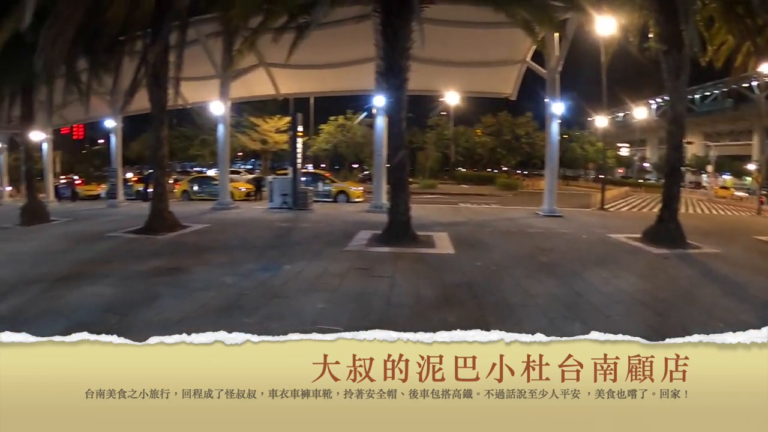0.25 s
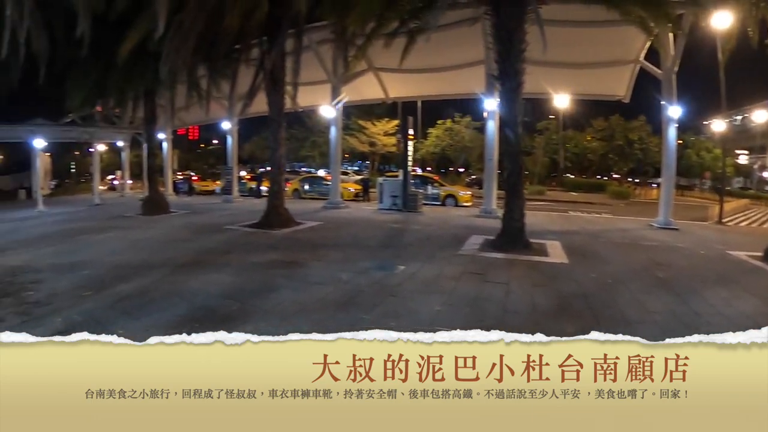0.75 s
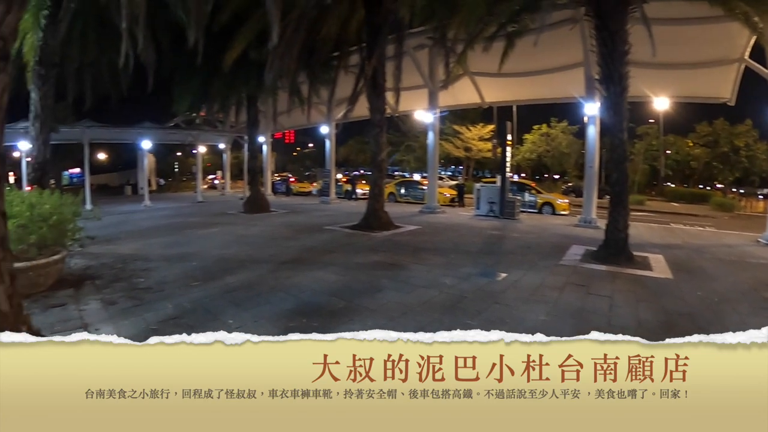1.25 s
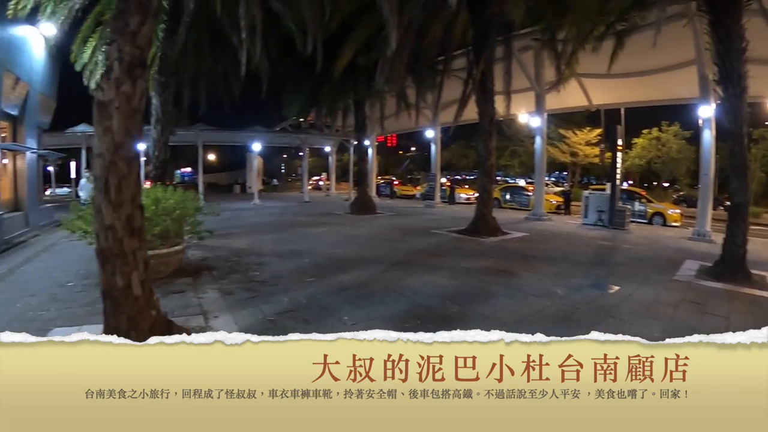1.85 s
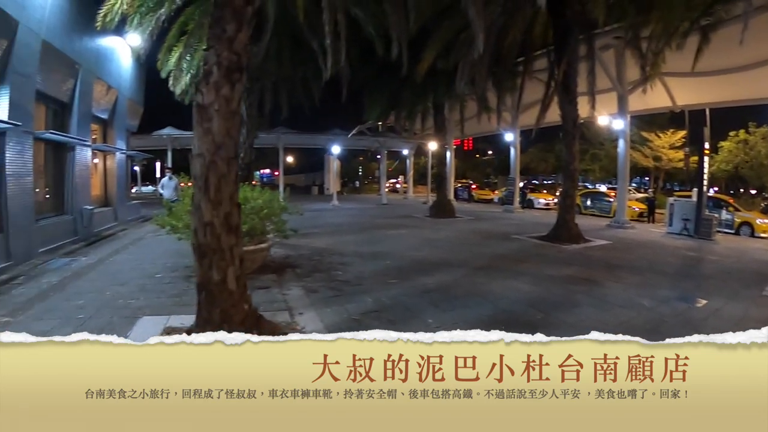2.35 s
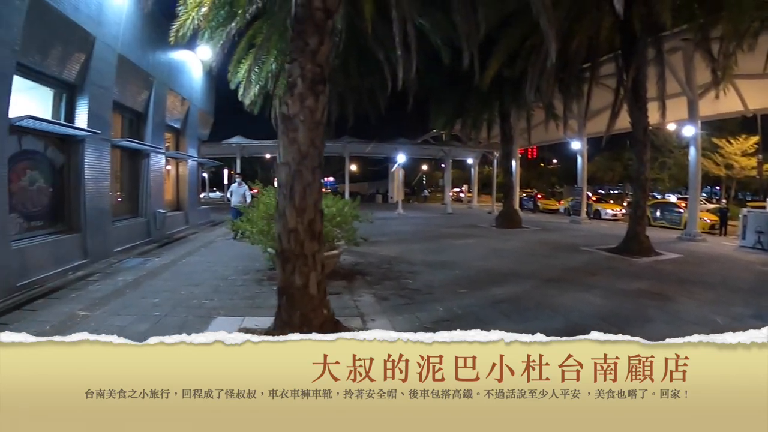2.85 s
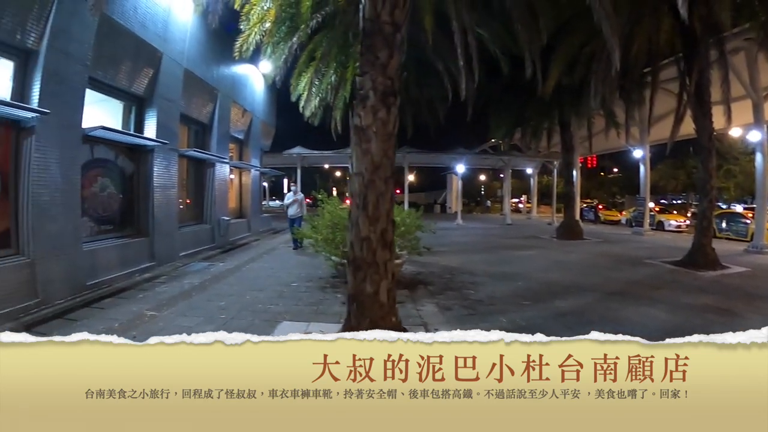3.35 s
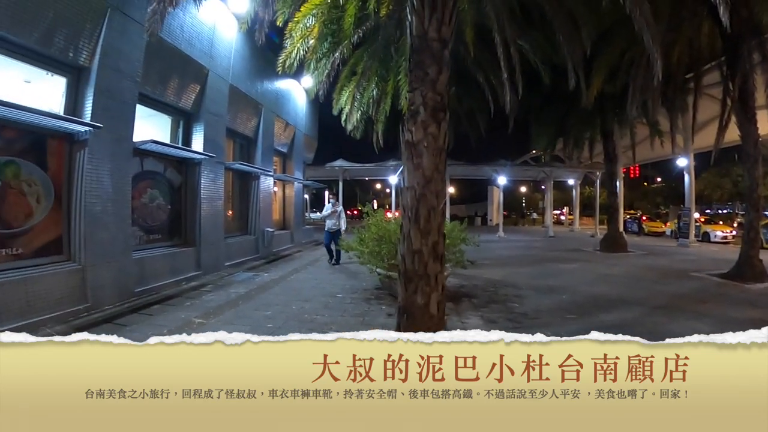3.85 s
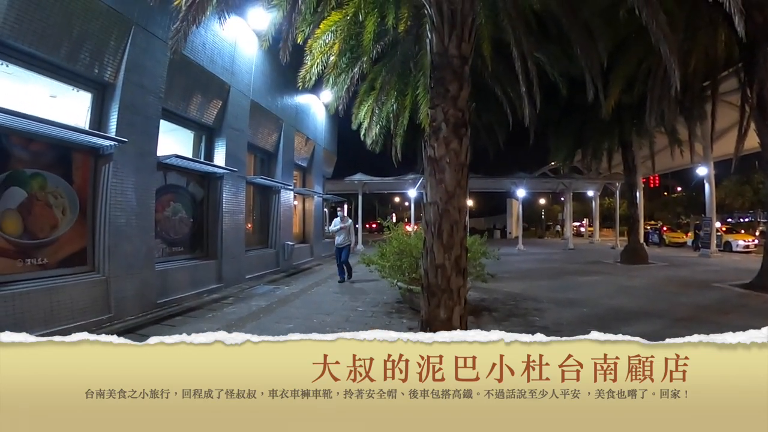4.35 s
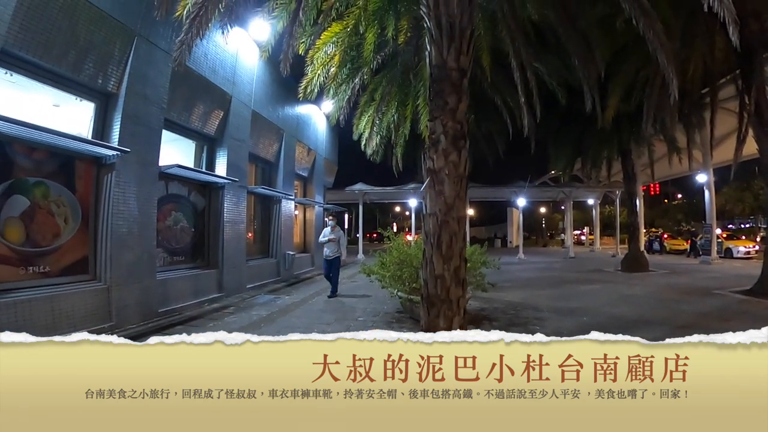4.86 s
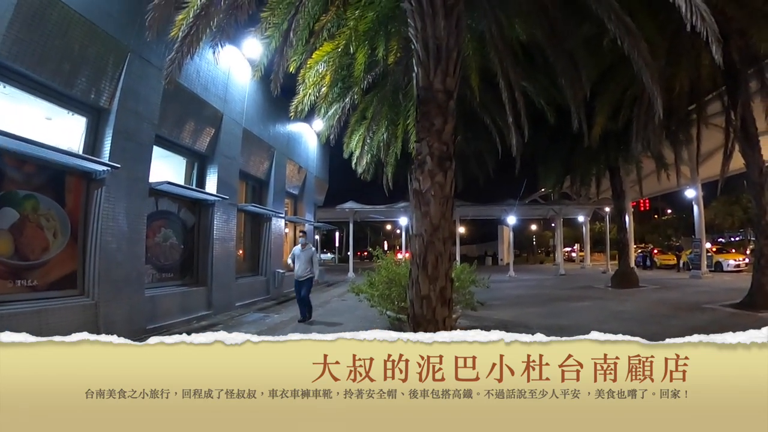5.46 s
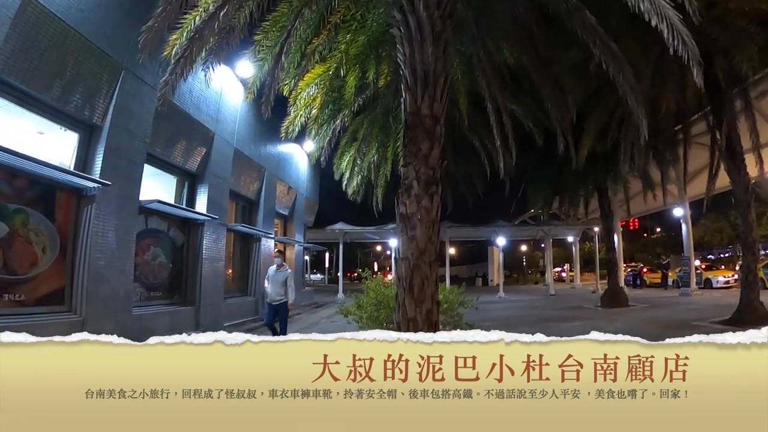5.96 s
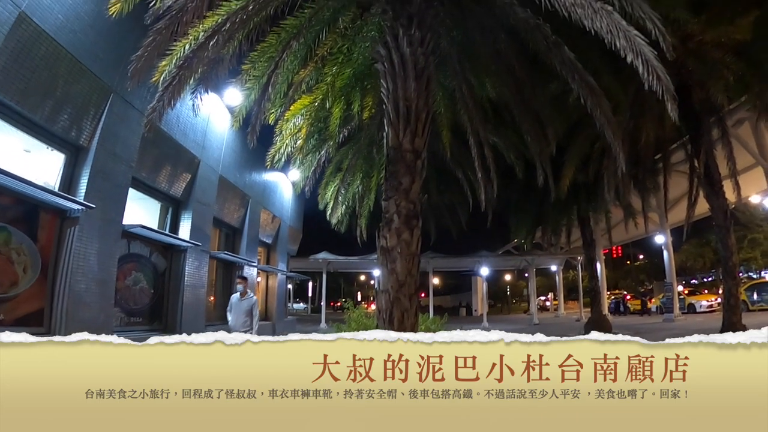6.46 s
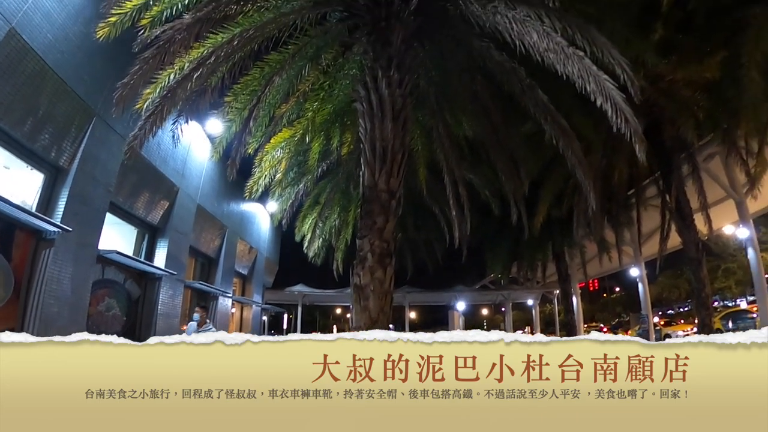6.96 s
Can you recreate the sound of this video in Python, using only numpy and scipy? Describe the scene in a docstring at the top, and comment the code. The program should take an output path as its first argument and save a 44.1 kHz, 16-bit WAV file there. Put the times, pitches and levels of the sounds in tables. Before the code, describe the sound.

A wide pavement beside a street at night, heard in stereo from about 13 metres. A dark, low rumble of distant engines runs throughout. From the start scooters approach faintly on the right, their exhaust drone and tyre rush growing; soft low air puffs bump the microphone at about 1.6 and 1.9 seconds. Around 2 to 2.5 the sound opens and brightens, with a wavering thin gear whine near 2.5 kHz and fine hiss. Two scooters and a third close behind sweep right to left around 3.5 to 3.7, all tones sliding down, the whine throbbing rapidly. An exhaust booms near 4.3, then a corner muffles them at about 4.6, leaving light echoes. A car's tyre roar and uneven low hum swell at 5.4 and ease. Air puffs come at 6.2 and 6.4, faint high squeaks at 6.3 to 6.5 and 6.8, and another car swells at about 7.

```python
"""First, together, the low rumble of a street at night and scooters coming near, on a two-port microphone.
It stands on a wide pavement. Two scooters come from the right and pass to the left some 13 m away, a third
engine just behind: exhausts drone as tone series, gears whine as wavering lines, tyres rush as shaped noise,
all the tones sinking as they go by. Puffs of air push the microphone. Cars follow with a roar of tyres (noise)
and a hum of engines (tones), and a few faint squeaks ring as narrow bands of noise."""
import sys
import numpy as np
from scipy import signal
from scipy.fft import rfft, irfft
from scipy.io import wavfile
from scipy.ndimage import uniform_filter1d

SR = 44100
rng = np.random.default_rng(int(sys.argv[2]) if len(sys.argv) > 2 else 0)


def unload_audio(sound):
    """Save the sound as a 16-bit wav file, at the path given as the first command line argument."""
    columns = np.transpose(np.atleast_2d(sound))
    # keep every value between -1 and 1, then stretch to whole-number steps
    steps = np.round(np.clip(columns, -1, 1) * 32767)
    wavfile.write(sys.argv[1], SR, steps.astype(np.int16))


N = 317520
FRAME, HOP = 2048, 512  # short-time spectra, samples
T = np.arange(N) / SR
FRAME_T = np.arange(-(-N // HOP) + 1)[:, None] * HOP / SR
HZ = np.fft.rfftfreq(FRAME, 1 / SR)


def amp(db):
    """Decibels to a linear factor."""
    return 10 ** (np.asarray(db) / 20)


def unit(x):
    """Scales a signal to rms 1."""
    return x / np.sqrt(np.mean(abs(x) ** 2) + 1e-20)


def curves(rows, t):
    """Each column of a table at the times t."""
    s, *columns = np.transpose(rows)
    return [np.interp(t, s, c) for c in columns]


def by_hz(points):
    """A spectrum table on the frequency bins, interpolated over log frequency."""
    f, value = np.transpose(points)
    return np.interp(np.log(HZ + 1), np.log(f), value)


def wander(rate_hz):
    """Slow random curve of rms 1: white noise through a Gaussian low-pass."""
    f = np.fft.rfftfreq(N, 1 / SR)
    slow = rfft(rng.standard_normal(N)) * np.exp(-(f / rate_hz) ** 2)
    return unit(irfft(slow, N))


def noise():
    """Short-time spectra of white noise."""
    a, b = rng.standard_normal((2, len(FRAME_T), len(HZ)))
    return (a + 1j * b) / np.sqrt(2)


def to_sound(z):
    """Short-time spectra back to a waveform."""
    return signal.istft(np.swapaxes(z, -1, -2), nperseg=FRAME, noverlap=FRAME - HOP)[1][..., :N]


def colour(shape):
    """Scales a spectrum so that noise through it has rms 1."""
    return shape / np.std(to_sound(noise() * shape))


# likeness of the two microphone ports for sound scattered by the street: f/Hz, correlation (-1 to 1)
PORT_LIKENESS = [(50, 0.88), (150, 0.94), (300, 0.3), (600, 0.11), (1500, 0.021), (3000, -0.51),
                 (7000, -0.58), (15000, -0.69)]


def scattered():
    """Noise that reaches the two ports from all sides, more alike in the bass than in the treble."""
    same = np.clip(by_hz(PORT_LIKENESS), -1, 1)
    mid = noise() * np.sqrt((1 + same) / 2)
    side = noise() * np.sqrt((1 - same) / 2)
    return np.array([mid + side, mid - side])


# a source at the far left, level difference of the ports: f/Hz, left over right level/dB
PORT_SHADE = [(100, -2.5), (170, 3), (260, 6.5), (400, 9.5), (900, 12.5), (2600, 17), (4500, 9), (7500, 7),
              (10000, -2), (15000, 6)]
# the same source, phase difference of the ports: f/Hz, left lead/rad
PORT_LEAD = [(50, 0.8), (200, 2.05), (400, 1.97), (800, 2.2), (2000, 3.2), (4000, 2.2), (5500, 2.62),
             (15000, 2.95)]


def ports(bearing, lead):
    """The ports differ in level by bearing and in phase by lead; both run from -1 right to 1 left."""
    left = amp(bearing * by_hz(PORT_SHADE) / 2) * np.exp(.5j * lead * by_hz(PORT_LEAD))
    pair = np.array([left, 1 / left])
    return pair / np.sqrt(np.mean(abs(pair) ** 2, 0))


def street(x, t60, wet_db):
    """Sparse echoes from house fronts and the canopy, decaying by 60 dB in t60 seconds."""
    t = T[:SR]
    taps = rng.standard_normal((2, SR)) * (rng.random((2, SR)) < .03)
    taps = taps * (t > .012) * amp(-60 * t / t60)
    taps /= np.linalg.norm(taps, axis=1, keepdims=True)
    return amp(wet_db) * signal.fftconvolve(x[None], taps, axes=1)[:, :N]


def receding(t, nearest_s, width_s):
    """Share of a vehicle's speed that points away: -1 coming, 0 abreast, 1 going."""
    return (t - nearest_s) / np.hypot(t - nearest_s, width_s)


def distance_db(t, nearest_s, width_s):
    """Spreading loss along a straight road, 0 dB at the nearest point."""
    return -10 * np.log10(1 + ((t - nearest_s) / width_s) ** 2)


# closest approach, and the time the scooters need to cover their distance from the listener
PASS_S, PASS_WIDTH_S = 3.67, .76
SPEED_M_PER_S, SOUND_M_PER_S = 16.7, 343
# they gather speed by this share of cruising speed per s until CRUISE_S, then hold it
CRUISE_S, SPEED_UP_PER_S = 2.5, .0105


def scooter_pitch(t):
    """Factor on every scooter tone: road speed times Doppler shift."""
    speed = 1 - SPEED_UP_PER_S * np.maximum(CRUISE_S - t, 0)
    return speed * (1 - SPEED_M_PER_S / SOUND_M_PER_S * receding(t, PASS_S, PASS_WIDTH_S))


# the bearing (-1 right to 1 left) swings about the moment the scooters are straight ahead
AHEAD_S, SWING_S, BEARING_SWING, BEARING_OFFSET = 3.51, 0.31, 0.96, -0.003


def scooter_ports(lead_s=3.56, lead_sweep_s=0.83):
    """The scooters sweep from right to left, quickly in level and more gradually in phase."""
    bearing = BEARING_OFFSET + BEARING_SWING * receding(FRAME_T, AHEAD_S, SWING_S)
    return ports(bearing, receding(FRAME_T, lead_s, lead_sweep_s))


def placed(x):
    """A single sound carried along with the scooters."""
    z = signal.stft(x, nperseg=FRAME, noverlap=FRAME - HOP)[2].T
    return to_sound(z * scooter_ports())


def behind_cars(t, clear_s, length_s):
    """1 while the parked cars hide the scooters, 0 once they are clear."""
    return (1 - np.tanh((t - clear_s) / length_s)) / 2


# something at the roadside screens the scooters briefly: t/s, length/s, loss level/dB
ROADSIDE_SCREEN = (3.965, 0.072, 5.7)
# then they go behind the house corner: t/s, length/s
HOUSE_CORNER = (4.58, 0.042)


def shadow_db(t, corner_db):
    """A brief loss behind the screen and a lasting one, corner_db, behind the corner."""
    s, length, loss_db = ROADSIDE_SCREEN
    corner_s, corner_length = HOUSE_CORNER
    hidden = (1 + np.tanh((t - corner_s) / corner_length)) / 2
    return -loss_db * np.exp(-((t - s) / length) ** 2) - corner_db * hidden


def engine(orders, crank_hz, flutter):
    """A firing every two turns gives tones at whole and half crank multiples; echoes blur the high ones most."""
    turns = np.cumsum(crank_hz * (1 + .003 * wander(10))) / SR
    tones = np.zeros(N)
    for multiple, db in orders:
        blur = flutter * (1 + .3 * (multiple - 1))
        beats = (1 + blur * (wander(8) + 1j * wander(8))) / np.sqrt(1 + 2 * blur ** 2)
        wave = beats * np.exp(2j * np.pi * (multiple * turns + rng.random()))
        tones += np.sqrt(2) * amp(db) * wave.real
    return tones


def tyres(level_db, bright_db, spectrum, direction, direct_db, scatter_db, treble_db, patchy_db,
          nearest_s, near_length, fizz_db):
    """Road roar as coloured noise whose treble follows bright_db, part direct and part scattered."""
    # air and shadow take the top first
    treble = by_hz([(900, 0.024), (2000, 0.82), (4000, 1.25), (7000, 0.94), (12000, 1.8)])
    patches = uniform_filter1d(noise().real, size=9, axis=0)
    patches = unit(uniform_filter1d(patches, size=40, axis=1))
    field_db = level_db + treble * (bright_db + treble_db) + patchy_db * patches
    # the finest hiss carries only from close by
    near = np.exp(-((FRAME_T - nearest_s) / near_length) ** 2)
    fizz = by_hz([(5000, 0.0096), (8000, 0.37), (11000, 0.78), (15000, 0.0)])
    field_db = field_db + fizz_db * near * fizz
    arrival = amp(direct_db) * noise() * direction + amp(scatter_db) * scattered()
    return to_sound(arrival * amp(field_db) * colour(amp(by_hz(spectrum))))


# low rumble of the street, before an overall gain: t/s, relative level/dB
RUMBLE_LEVEL = [(0, -30), (1.4, -29.5), (2.4, -29), (3.7, -29.5), (3.88, -26), (4.3, -29), (5.3, -27),
                (6.3, -27.5), (7.2, -25)]
# its spectrum: f/Hz, relative level/dB per Hz
RUMBLE_SPECTRUM = [(10, -5), (25, -7), (38, 2), (55, 4.5), (80, -1), (120, 0), (170, -6.5), (240, -5.5),
                   (350, -12), (700, -45), (2000, -57.5)]


def rumble(gain_db):
    """Many far engines merge into a dark, nearly single-point rumble, a little stronger on the left."""
    level_db = curves(RUMBLE_LEVEL, T)[0]
    sound = to_sound(scattered() * colour(amp(by_hz(RUMBLE_SPECTRUM))))
    balance = amp([[.7], [-.7]])
    return sound * amp(level_db + gain_db) * balance


# tyre rush of the scooters: f/Hz, relative level/dB per Hz
SCOOTER_SPECTRUM = [(60, -15), (170, 1), (270, 0), (350, -4.5), (440, -3), (550, -1.5), (750, -5),
                    (1050, -4), (1500, -8), (2200, -12.5), (3300, -16.5), (4800, -22.5), (7000, -31),
                    (9500, -40.5), (12800, -36.5), (15500, -56)]


def scooter_rush(peak_db=-19.5, far_db=-32.0, loudest_s=3.504, width_s=1.14, abreast_db=3, abreast_s=0.32,
                 dull_db=-17.0, bright_db=2.5, brightest_s=2.26, bright_length=1.0,
                 clear_s=2.34, clear_length=0.2, parked_db=2.5, masked_db=2.0, echo_front=0.2, echo_rear=0.24):
    """Tyres throw their rush fore and aft: it eases abreast, and opens up as they clear the parked cars."""
    abreast = np.exp(-((FRAME_T - loudest_s) / abreast_s) ** 2)
    near_db = peak_db + 1.45 * distance_db(FRAME_T, loudest_s, width_s) - abreast_db * abreast
    near_db = near_db - parked_db * behind_cars(FRAME_T, clear_s, clear_length)
    level_db = 20 * np.log10(np.hypot(amp(near_db), amp(far_db))) + shadow_db(FRAME_T, corner_db=5.5)
    top_db = dull_db + bright_db / (1 + ((FRAME_T - brightest_s) / bright_length) ** 4)
    # the treble comes through first
    top_db = top_db - masked_db * behind_cars(FRAME_T, clear_s=1.63, length_s=0.081)
    # house fronts scatter more as they leave
    going = (1 + receding(FRAME_T, PASS_S, PASS_WIDTH_S)) / 2
    echoed = np.clip(echo_front + (echo_rear - echo_front) * going, .02, .9)
    return tyres(level_db, top_db, SCOOTER_SPECTRUM, scooter_ports(),
                 10 * np.log10(1 - echoed), 10 * np.log10(echoed), treble_db=15,
                 patchy_db=1.0, nearest_s=3.7, near_length=1.4, fizz_db=8.0)


CRANK_HZ = 130.4  # crankshaft turns per s at cruising speed, before Doppler
THROB = .13  # how deeply the firings chop the rush at the nearest point


def throbbing(rush, top_hz=1700):
    """Intake and exhaust air roughen the body of the rush once per firing while the scooters are near."""
    firings = np.cumsum(CRANK_HZ / 2 * scooter_pitch(T) * (1 + .02 * wander(8))) / SR
    puff = unit(np.cos(2 * np.pi * firings) + .7 * np.cos(4 * np.pi * firings))
    depth = THROB * amp(distance_db(T, PASS_S, 1.2))
    body = signal.sosfiltfilt(signal.butter(2, top_hz, fs=SR, output="sos"), rush)
    return rush + depth * puff * body


# thin bands of hiss, mainly near 5 kHz: f/Hz, relative level/dB per Hz
HISS_SPECTRUM = [(2500, -30), (4000, 2), (5100, 15), (6300, -46), (7800, 0), (9500, -38), (11300, -9),
                 (14000, -20), (15500, -21)]


def thin_hiss(level_db=-48, loudest_s=3.05, rise_s=1.9, fall_s=0.51):
    """Thin noise bands, mainly near 5 kHz, swell until about 3 s and then fade, moving with the scooters."""
    width_s = np.where(FRAME_T < loudest_s, rise_s, fall_s)
    gain = amp(level_db + 4.3 * distance_db(FRAME_T, loudest_s, width_s))
    arrival = noise() * scooter_ports() + .5 * scattered()
    return to_sound(arrival * gain * colour(amp(by_hz(HISS_SPECTRUM))))


# exhaust tones of the louder scooter, before gain and distance:
# multiple of the crank speed, relative level/dB from the front, from the rear
LOUDER_ORDERS = [(1, -43, -31), (1.5, -33, -55), (2, -40, -47), (2.5, -34, -41), (3, -32, -34.5),
                 (4.5, -40, -50), (5.5, -41, -45), (6, -44, -33.5), (7, -39.5, -32.5), (7.5, -36.5, -38),
                 (8.5, -38, -43.5), (10.5, -38.5, -43)]
# exhaust overtones of its companion: same columns
COMPANION_ORDERS = [(2, -40, -37.5), (3, -44, -42), (4, -35, -48), (5, -46, -52), (6.5, -38.5, -33.5),
                    (7, -47, -40)]
# the companion's lowest exhaust tone, loudest on the way in: t/s, level/dB
COMPANION_LOWEST = [(.15, -44), (.4, -27), (.7, -34.5), (1.05, -27), (1.35, -39), (1.65, -32),
                    (1.92, -25.5), (2.25, -34), (2.5, -24), (2.75, -26), (3.1, -36.5), (3.75, -28.5),
                    (4.3, -35), (4.8, -39)]
# the boom of one exhaust pipe: t/s, level/dB
PIPE_BOOM = [(2.1, -45), (2.5, -24), (2.75, -44), (2.92, -23), (3.15, -40), (3.52, -26), (3.7, -31),
             (3.88, -23), (4, -33.5), (4.15, -21), (4.33, -19.5), (4.52, -23.5), (4.64, -35), (7.2, -36)]
# the silencer, blown by the gas flow: f/Hz, width/Hz, relative level/dB
SILENCER_MODES = [(243, 12, -3), (258.4, 16, -3), (279, 36, -5.5), (503, 29, -12.5), (879, 25, -11.5)]
COMPANION_ENGINE = 1.034  # the companion's factor on the crank speed
BOOM_HZ = 264  # at cruising speed, before Doppler


def exhaust(gain_db=-1.0, falloff=0.65, gas_db=-26, gas_falloff=1.3, left_db=1.0, rear_left_db=2.5):
    """Two engines beat over gas ringing in their silencers; one pipe booms as it turns to the listener."""
    near_db = distance_db(T, PASS_S, PASS_WIDTH_S)
    away = receding(T, PASS_S, PASS_WIDTH_S)
    going = (1 + away) / 2
    pitch = scooter_pitch(T)
    common_db = gain_db + falloff * near_db + shadow_db(T, corner_db=9.0)

    def heard(table):
        """Tone levels that turn from front to rear as the scooter passes."""
        return [(k, front_db + (rear_db - front_db) * going + common_db) for k, front_db, rear_db in table]

    companion = heard(COMPANION_ORDERS) + [(1, curves(COMPANION_LOWEST, T)[0])]
    tones = engine(heard(LOUDER_ORDERS), CRANK_HZ * pitch, flutter=.32)
    tones = tones + engine(companion, COMPANION_ENGINE * CRANK_HZ * pitch, flutter=.18)
    boom = engine([(1, curves(PIPE_BOOM, T)[0])], BOOM_HZ * pitch, flutter=.15)
    frame_pitch = scooter_pitch(FRAME_T)
    pipe = sum(amp(db) / (1 + ((HZ - hz * frame_pitch) / width * 2) ** 2) for hz, width, db in SILENCER_MODES)
    # the gas gains a little past the corner
    gas_gain = amp(gas_db + gas_falloff * near_db + shadow_db(T, corner_db=-1.5))
    gas = to_sound(noise() * colour(pipe)) * gas_gain
    sound = tones + boom + gas + straggler()
    # left up and right down by the same dB, more so once they are going
    lean = amp(np.array([[1], [-1]]) * (left_db + rear_left_db * np.maximum(away, 0)))
    lean = lean / np.sqrt(np.mean(lean ** 2, 0))
    return (placed(sound) + street(sound, t60=0.54, wet_db=-10)) * lean


def gears(hz, jitter, flutter, halo_db):
    """Meshing teeth give a wavering line; echoes beat against it, and uneven running adds a halo."""
    turn = np.exp(2j * np.pi * np.cumsum(hz * (1 + jitter * wander(20))) / SR)
    beats = flutter * (wander(26) + 1j * wander(26))
    halo = amp(halo_db) * (wander(170) + 1j * wander(99))
    power = 1 + 2 * flutter ** 2 + 2 * amp(halo_db) ** 2
    return np.sqrt(2 / power) * (turn * (1 + beats + halo)).real


# the whine's echo: deepest dip, dips per s there, time over which the dips slow down, peak strength (0-1)
DIP_S, DIPS_PER_S, DIP_SPREAD_S, ECHO_SHARE = 3.81, 9.15, 1.6, .8


def wall_beats(length_s=0.36):
    """The tone and its house-front echo cancel in turn: a fast, deep throb about the moment DIP_S."""
    cycles = DIPS_PER_S * DIP_SPREAD_S * receding(T, DIP_S, DIP_SPREAD_S)
    echo = ECHO_SHARE * np.exp(-((T - DIP_S) / length_s) ** 2)
    return abs(1 - echo * np.exp(2j * np.pi * cycles)) / np.sqrt(1 + echo ** 2)


# the whine of the louder transmission, before its echoes: t/s, level/dB
WHINE_LEVEL = [(0, -53.5), (.95, -51), (1.2, -45), (1.6, -49), (1.98, -40), (2.07, -36.5), (2.27, -32),
               (2.37, -46), (2.49, -30.5), (2.6, -42), (2.72, -37), (3.3, -31), (3.6, -32), (3.85, -31.5),
               (3.97, -35), (4.07, -30), (4.2, -31.5), (4.36, -31), (4.5, -40), (4.59, -33.5),
               (4.69, -47.5), (5.25, -41), (5.55, -54), (5.8, -45), (6.1, -58), (7.2, -63)]
WHINE_HZ, COMPANION_GEARS = 2542, 1.024  # at cruising speed, before Doppler; the companion's factor on it


def whine(gain_db=0, companion_db=-7.5):
    """Both transmissions sing and slide down together, unsteady far off and again while abreast."""
    hz = WHINE_HZ * scooter_pitch(T)
    abreast = np.exp(-((T - 3.4) / .45) ** 2)
    hidden = behind_cars(T, clear_s=2.0, length_s=.1)  # far off, only scattered echoes arrive
    louder = gears(hz, jitter=.002 + .004 * abreast, flutter=.25 + .35 * abreast + .6 * hidden, halo_db=-11)
    companion = gears(COMPANION_GEARS * hz, jitter=.005, flutter=.9, halo_db=-2)
    both = louder * wall_beats() + amp(companion_db) * companion
    sound = amp(gain_db + curves(WHINE_LEVEL, T)[0]) * both
    return placed(sound) + street(sound, t60=0.62, wet_db=-10)


# puffs of air on the microphone: t/s, peak level/dB, f/Hz, length/s
AIR_PUFFS = [(1.569, -19, 60, 0.0067), (1.935, -12, 45, 0.0063), (6.157, -14, 66, 0.019),
             (6.437, -16, 67.6, 0.034)]


def puffs():
    """Each puff of air is a short, low push, the same at both ports."""
    out = np.zeros(N)
    for s, db, hz, length in AIR_PUFFS:
        push = np.cos(2 * np.pi * (hz * (T - s) + rng.random()))
        out += amp(db) * np.exp(-((T - s) / length) ** 2) * push
    return out


# main tone of a third engine close behind: t/s, level/dB
STRAGGLER_LEVEL = [(1.2, -53), (2.1, -31.5), (2.6, -30.5), (2.86, -30.5), (3.04, -35), (3.2, -25),
                   (3.31, -40), (3.42, -28), (3.55, -46), (3.7, -41), (3.85, -30), (4, -42), (4.25, -28),
                   (4.7, -52), (7.2, -47)]
# its crankshaft turns per s at cruising speed before Doppler, and how much later it passes
STRAGGLER_HZ, STRAGGLER_LAG_S = 142.3, .08


def straggler(gain_db=0, overtone_db=-46):
    """The third engine drones a little higher than the other two and glides down just after them."""
    fuller = 8 * behind_cars(T, clear_s=2.95, length_s=0.18)  # the overtone is stronger early on, dB
    overtone = overtone_db + fuller + 1.3 * distance_db(T, 2.3, 0.66)
    orders = [(2, curves(STRAGGLER_LEVEL, T)[0] + gain_db), (3, overtone)]
    return engine(orders, STRAGGLER_HZ * scooter_pitch(T - STRAGGLER_LAG_S), flutter=.25)


# cars that follow: nearest t/s, half length/s, level/dB there, relative treble level/dB
FOLLOWING_CARS = [(5.447, 0.89, -26.5, -15.5), (7.162, 0.66, -24.5, -18)]
# their direction: t/s, bearing (-1 right to 1 left)
CAR_BEARING = [(4.7, 0.012), (5.15, 0.44), (5.45, 0.0077), (5.8, -0.37), (6.4, -0.38), (6.8, 0.52),
               (7.2, 0.39)]
# their tyres: f/Hz, relative level/dB per Hz
TRAFFIC_SPECTRUM = [(80, -6.5), (250, -1), (390, -2.5), (500, 1), (750, -2), (1100, 0), (1600, -8),
                    (2300, -16), (3300, -20.5), (5000, -26.5), (7000, -34), (9500, -52), (12800, -41),
                    (15500, -60)]


def traffic(falloff=1.24):
    """The following cars swell and fade with distance and merge into one roar."""
    powers = [amp(db + falloff * distance_db(FRAME_T, s, width)) ** 2 for s, width, db, _ in FOLLOWING_CARS]
    total = sum(powers)
    top_db = sum(power * car[3] for power, car in zip(powers, FOLLOWING_CARS)) / total
    bearing, = curves(CAR_BEARING, FRAME_T)
    return tyres(10 * np.log10(total), top_db, TRAFFIC_SPECTRUM, ports(bearing, bearing),
                 direct_db=-5.0, scatter_db=-2.0, treble_db=18,
                 patchy_db=0.9, nearest_s=5.46, near_length=0.55, fizz_db=12.5)


# engine drone of the following cars: multiple of the crank speed, relative level/dB
CAR_ORDERS = [(1, -3.5), (2, -7)]


def drone(level_db=-33, crank_hz=123, sag_hz_per_s=1.5, nearest_s=6.6, width_s=2.7):
    """The engines of the following cars hum unevenly and sink a little in pitch."""
    tones = engine(CAR_ORDERS, crank_hz - sag_hz_per_s * (T - nearest_s), flutter=0.39)
    return tones * amp(level_db + 2 * distance_db(T, nearest_s, width_s))


# faint squeaks from the street: t/s, level/dB, f/Hz, width/Hz, length/s
STREET_SQUEAKS = [(6.313, -45, 3750, 250, .008), (6.42, -40, 3850, 250, 0.011),
                  (6.465, -51, 3670, 250, .007), (6.78, -40, 3600, 247.8, 0.01)]


def squeaks():
    """Brief narrow rings, far off: narrow-band scattered noise under a short bell-shaped swell."""
    out = np.zeros((2, N))
    for s, db, hz, width, length in STREET_SQUEAKS:
        ring = to_sound(scattered() * np.exp(-((HZ - hz) / width) ** 2))
        out += amp(db) * unit(ring) * np.exp(-((T - s) / length) ** 2)
    return out


def scene():
    """The street at the microphone: the scooters' pass, the cars behind them and the small sounds."""
    scooters = throbbing(scooter_rush()) + thin_hiss() + exhaust() + whine()
    return rumble(gain_db=3.0) + scooters + puffs() + traffic() + drone() + squeaks()


EDGE_HZ = 15750


def record(dry):
    """The recorder's band limit: a steep low-pass at EDGE_HZ."""
    low_pass = signal.firwin(511, EDGE_HZ, window=("kaiser", 9), fs=SR)
    return signal.oaconvolve(dry, low_pass[None], "same")


dry = scene()
out = record(dry)
unload_audio(out)
```